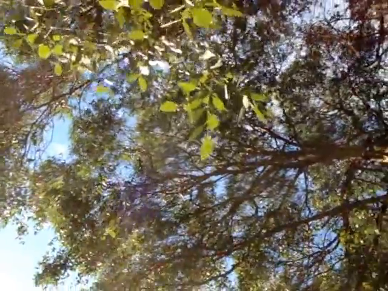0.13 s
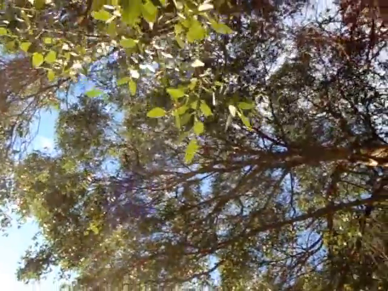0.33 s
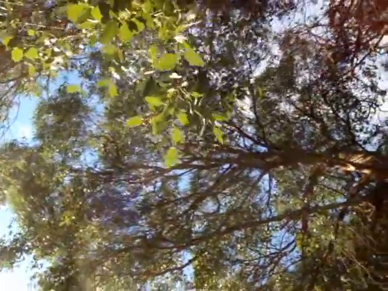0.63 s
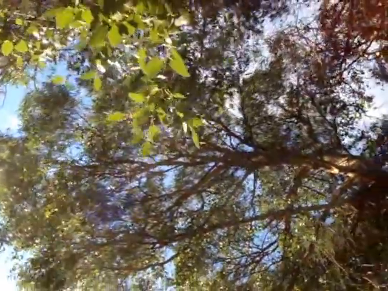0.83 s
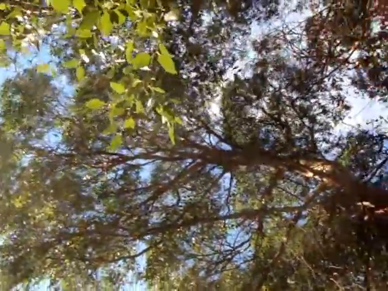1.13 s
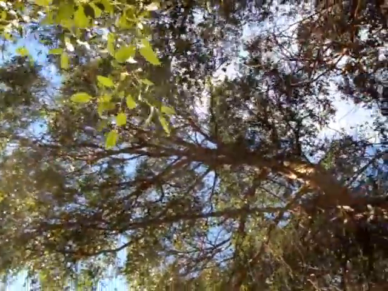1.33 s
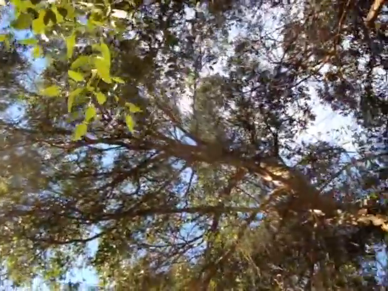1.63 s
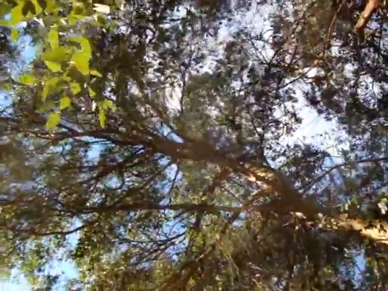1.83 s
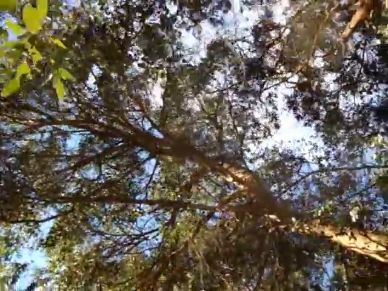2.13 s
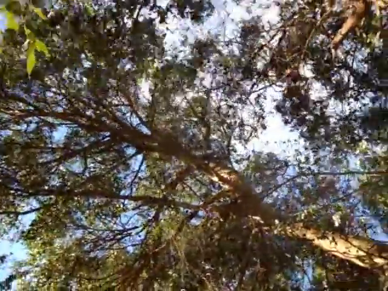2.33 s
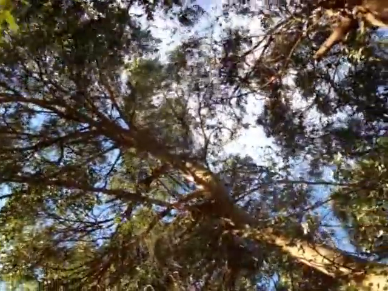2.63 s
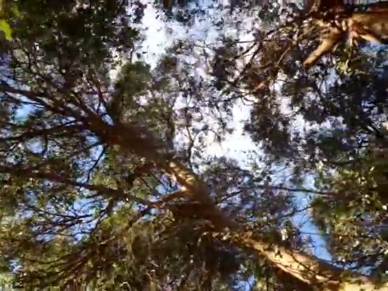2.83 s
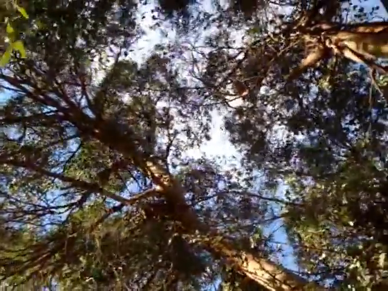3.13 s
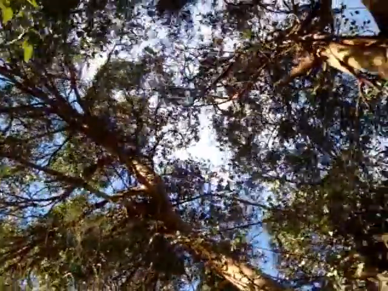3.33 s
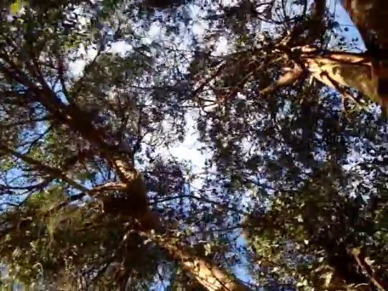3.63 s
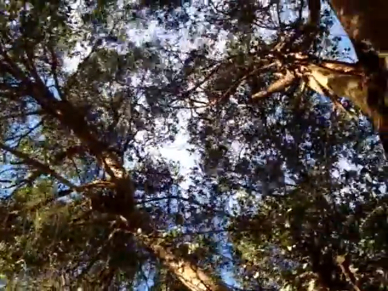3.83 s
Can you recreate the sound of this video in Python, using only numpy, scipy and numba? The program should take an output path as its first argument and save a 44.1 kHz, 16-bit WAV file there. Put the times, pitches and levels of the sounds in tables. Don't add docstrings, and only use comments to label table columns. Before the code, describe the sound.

Wind swells through tall tree leaves, with low thumps buffeting the microphone and faint bird chirps.

```python
import sys
import numpy as np
from scipy import signal
from scipy.fft import rfft, irfft
from scipy.io import wavfile
from numba import njit

SR = 44100
rng = np.random.default_rng(int(sys.argv[2]) if len(sys.argv) > 2 else 0)


def voltage_ratio(decibels):
    exponent = np.asarray(decibels, float) / 20
    return 10 ** exponent


def wav_record(signal):
    frames = np.transpose(np.atleast_2d(signal))
    bounded = np.clip(frames, -1, 1)
    quanta = np.round(bounded * 32767).astype(np.int16)
    wavfile.write(sys.argv[1], SR, quanta)


N = 176400

# time in seconds, close leaf hiss in dB, far canopy roar in dB.
WIND = [
    (0.0, -48.5, -51.5),
    (0.51, -47, -49),
    (0.68, -46, -49),
    (1.25, -44, -45.5),
    (1.73, -42, -43),
    (2.46, -38, -43),
    (2.87, -38, -43),
    (4.0, -41, -44.5),
]


def unit(x):
    return x / np.sqrt(np.mean(x ** 2))


def curve(table, axis=1):
    rows = np.array(table, float)
    return np.interp(np.arange(N) / SR, rows[:, 0], rows[:, axis])


def walk(rate):
    levels = rng.standard_normal(600)
    at = np.arange(N) * (rate / SR)
    k = at.astype(int)
    u = at - k
    slew = u * u * (3 - 2 * u)
    return 1.15 * (levels[k] + (levels[k + 1] - levels[k]) * slew)


def band(x, hz, octaves):
    edges = np.clip(hz * 2 ** (octaves / 2 * np.array([-1, 1])), 10, SR / 2.2)
    return signal.sosfilt(signal.butter(2, edges, "band", fs=SR, output="sos"), x)


def burst(s, length, lo_hz, hi_hz):
    hz, t = np.arange(N // 2 + 1) * SR / N, np.arange(N) / SR
    inside = (hz > lo_hz) & (hz < hi_hz)
    noise = irfft(rfft(rng.standard_normal(N)) * inside, N)
    return unit(noise) * np.exp(-((t - s) / length) ** 2)


@njit
def wavelets(n, at, size, step, cycles, phase):
    out = np.zeros(n)
    for k in range(len(at)):
        width = cycles[k] / step[k] / 2
        for i in range(max(0, int(at[k] - 3 * width)), min(n, int(at[k] + 3 * width))):
            d = i - at[k]
            out[i] += size[k] * np.exp(-(d / width) ** 2) * np.sin(2 * np.pi * (step[k] * d + phase[k]))
    return out


def bird():
    # start in seconds, length in seconds, level in dB, first pitch in Hz, last pitch in Hz.
    whistles = [(0.455, 0.053, -51, 3530, 3480), (0.488, 0.028, -43.5, 3400, 3480),
                (0.507, 0.046, -49, 3530, 3440), (0.53, 0.039, -53, 3680, 3630),
                (0.553, 0.04, -46.5, 3580, 3570), (0.589, 0.036, -42, 3544, 3565),
                (0.617, 0.032, -40, 3565, 3610), (0.651, 0.024, -42, 3640, 3550),
                (0.656, 0.033, -45.5, 3460, 3460), (.69, .02, -52, 3560, 3570),
                (0.698, .025, -52, 3450, 3500), (0.857, 0.018, -52, 3980, 3940),
                (0.878, .015, -50, 3900, 3890), (.89, .028, -51, 3950, 3880),
                (0.912, 0.029, -51, 3400, 3440), (0.942, .025, -56, 3750, 3850),
                (2.493, 0.02, -42.5, 3910, 3890), (2.512, 0.025, -44, 3730, 3960),
                (2.535, 0.018, -43, 4040, 4150), (2.558, 0.016, -48, 4000, 4000),
                (2.645, .025, -48, 4050, 3950), (2.859, 0.035, -46, 4720, 4670),
                (2.878, .02, -50, 4480, 4500), (3.041, 0.018, -42, 3920, 3920),
                (3.055, .018, -46, 4060, 4090), (3.056, .016, -45, 3780, 3670),
                (3.072, .02, -48, 3900, 3920), (3.083, 0.028, -42, 4160, 4140),
                (3.123, .016, -50, 4100, 4060)]
    t, out = np.arange(N) / SR, 0
    warble = 1 + .004 * walk(140)
    trill = np.cumsum(85 * (1 + 0.19 * walk(30))) / SR
    tremor = voltage_ratio(1.2 * walk(90)) * (1 + 0.3 * np.sin(2 * np.pi * trill))
    for s, length, db, hz0, hz1 in whistles:
        u = np.clip((t - s) / length, 0, 1)
        tone = np.sin(2 * np.pi * np.cumsum((hz0 + (hz1 - hz0) * u) * warble) / SR)
        breath = np.sin(np.pi * u) ** .5
        out = out + voltage_ratio(db) * breath * tone * tremor * np.sqrt(2)
    echo_s, echo_db = .018, -10
    lag = np.arange(SR // 4) / SR
    trunks = rng.standard_normal(len(lag)) * np.exp(-lag / echo_s) * (lag > .004)
    trunks = trunks / np.sqrt(np.sum(trunks ** 2))
    return out + voltage_ratio(echo_db) * signal.fftconvolve(out, trunks)[:N]


def twigs():
    # time in seconds, peak in dB, pitch in Hz, length in cycles.
    ticks = [(.0675, -32, 5900, 17), (.304, -35, 2700, 1.4), (.3065, -40, 2850, 8), (.8325, -34, 1850, 4),
             (.8342, -35, 3700, 7), (.8352, -30.5, 2700, 6), (.993, -36, 3100, 7), (.9925, -37, 3900, 1.6),
             (2.4775, -24, 2600, 1.0), (2.4785, -29, 1250, 2), (2.4795, -28, 2150, 5),
             (2.4825, -28, 1800, 1.6), (2.6945, -25, 3500, 2)]
    s, db, hz, cycles = np.array(ticks, float).T
    return wavelets(N, s * SR, voltage_ratio(db), hz / SR, cycles, rng.random(64)[:len(s)])


def shivers():
    # middle in seconds, length in seconds, low edge in Hz, high edge in Hz, level in dB.
    flutters = [
        (3.67, .09, 7300, 8400, -49),
        (2.27, .05, 1500, 9000, -46),
        (3.275, .016, 6650, 7300, -42),
        (3.283, .005, 6000, 9700, -39),
        (.885, .04, 3700, 4150, -52),
        (2.53, .03, 3700, 4200, -47),
        (3.075, .035, 3700, 4250, -47),
        (.835, .003, 1300, 4600, -44),
    ]
    return sum(voltage_ratio(db) * burst(s, length, lo, hi) for s, length, lo, hi, db in flutters)


def thumps():
    # time in seconds, peak in dB, pitch in Hz, length in cycles.
    strikes = [(1.2294, -25.5, 240, 1.7), (1.276, -21, 313, 1.3), (1.2869, -25, 190, 1.5),
               (1.2934, -14.5, 207, 0.92), (1.3297, -20.3, 175, 0.48), (1.3386, -25.5, 244, 1.5),
               (1.386, -22.5, 190, 1.5), (1.424, -20.5, 265, 1.3), (1.4371, -18.5, 341, 0.73),
               (1.4487, -28, 136, 1.5), (1.4607, -18, 190, 0.45), (1.4655, -21, 225, 0.8),
               (1.473, -18, 207, 0.91), (1.4917, -25, 207, 1.3), (1.499, -18.5, 244, 0.96),
               (1.5118, -26, 161, 1.8), (1.522, -14.5, 225, 0.63), (1.5308, -21.5, 313, 1.5),
               (1.5382, -20.5, 313, 1.26), (1.5619, -21.5, 437, 1.7), (1.6016, -26, 244, 1.1),
               (1.6067, -19, 288, 0.9), (1.6124, -25.4, 175, 1.1), (1.6213, -24, 288, 1.5),
               (1.6447, -22.8, 190, 1.5), (1.6612, -20, 190, 1.4), (1.6753, -16.5, 265, 1.5),
               (1.6798, -27, 207, 0.73), (1.6926, -22, 207, 2), (1.705, -20.7, 190, 0.9),
               (1.7157, -18.5, 223, 1.7), (1.731, -10.5, 225, 0.37), (1.7379, -23, 265, 1.3),
               (1.7419, -18, 190, 1.5), (1.7497, -25.1, 91, 1.7), (1.7606, -23, 265, 0.93),
               (1.7687, -21.5, 288, 1.1), (1.7757, -17.5, 313, 0.89), (1.7878, -17, 206, 0.87),
               (1.8134, -6, 266, 0.46), (1.8243, -23.5, 148, 1.4), (1.832, -15, 225, 1.2),
               (1.8429, -18, 225, 1.3), (1.856, -19.5, 244, 1.8), (1.8867, -22, 313, 1.8),
               (1.899, -18, 267, 1), (1.9067, -19, 288, 0.88), (1.9211, -18, 247, 1.7),
               (1.9311, -16.5, 244, 0.51), (2.0063, -26, 138, 1.1),
               (2.6843, -27, 161, 0.94), (2.7826, -20.5, 161, 0.48), (2.8742, -20.5, 173, 0.73),
            (2.8856, -23, 125, 0.57), (3.1208, -23.5, 207, 0.68), (3.3137, -25.5, 105, 0.95),
            (3.6801, -27.5, 175, 1.1), (3.6958, -24.8, 207, 1.04), (3.8167, -14.5, 203, 0.67),
            (3.854, -23, 190, 0.74), (3.866, -9.5, 341, 0.77), (3.8903, -26.5, 175, 1),
            (3.9259, -19, 174, 0.77),
               (1.077, -24, 205, .6),
        (1.11, -33, 200, .8),
        (1.18, -27, 200, 1.6),
        (1.972, -32, 150, 0.9),
        (1.991, -28, 210, 1),
        (2.108, -29, 220, 0.64),
        (2.13, -22.5, 230, .6),
        (2.166, -29, 170, 1.1),
        (3.04, -29, 130, 0.84),
        (3.973, -30, 130, .8),
    ]
    s, db, hz, cycles = np.array(strikes, float).T
    side = rng.integers(0, 2, 128)[:len(s)] / 2 - .06
    return wavelets(N, s * SR, 0.67 * voltage_ratio(db), hz / SR, 1.18 * cycles, side)


def eddies():
    # time in seconds, level in dB.
    stream = [(0, -88), (.95, -75), (1.04, -46.5), (1.4, -36.5), (1.75, -33), (1.93, -33.5), (2.03, -49),
              (2.08, -60), (2.14, -39), (2.2, -62), (2.38, -52.5), (2.46, -64), (2.7, -51), (2.95, -54),
              (3.05, -42.5), (3.2, -63), (3.31, -47), (3.36, -84)]
    # middle in seconds, length in seconds, level in dB.
    puffs = [
        (3.688, 0.016, -41),
        (3.88, 0.057, -41.5),
        (3.973, 0.051, -48),
        (2.878, 0.019, -44),
    ]
    per_s, spread_db = 300, 2.1
    mid_hz, hz_per_db, octaves = 249, 6, 0.48
    t = np.arange(N) / SR
    puff = sum(voltage_ratio(db) * np.exp(-((t - s) / length) ** 2) for s, length, db in puffs)
    strength = (voltage_ratio(curve(stream)) + puff) * voltage_ratio(walk(24.9))
    draw, octs = rng.random((3, 2000)), rng.standard_normal(2000)
    at = np.cumsum(-np.log(1 - draw[0])) / per_s * SR
    keep = at < N - 1
    at, draw, octs = at[keep], draw[:, keep], octs[keep]
    here = strength[at.astype(int)]
    centre_hz = np.clip(mid_hz + hz_per_db * (20 * np.log10(here) + 35), 50, 500)
    hz = centre_hz * 2 ** (octaves * octs)
    size = here * voltage_ratio(-spread_db * np.log(1 - draw[1]))
    cycles = 0.94 * (0.59 + 0.95 * draw[0])
    return wavelets(N, at, size, hz / SR, cycles, draw[2])


def foliage(colour, taps_db):
    taps_per_s, spread_db = 740, -0.5
    swell_db, patch_db, flicker_db = 0.07, 0.08, 0.56
    pts = np.array(colour, float)
    chance = rng.random((2, N))
    taps = unit((chance[0] < taps_per_s / SR) * voltage_ratio(-spread_db * np.log(1 - chance[1])))
    out, swell, patch = 0, walk(3), walk(6)
    for hz in 31.25 * 2 ** np.arange(0, 8.5, 1 / 3):
        patch = .8 * patch + .6 * walk(6)
        air = unit(band(rng.standard_normal(N) + voltage_ratio(taps_db) * taps, hz, 1 / 3))
        db = np.interp(np.log(hz), np.log(pts[:, 0]), pts[:, 1], pts[0, 1] - 15)
        db = db + 10 * np.log10(hz)
        out = out + voltage_ratio(db + swell_db * swell + patch_db * patch + flicker_db * walk(18)) * air
    return unit(out)


def canopy_roar():
    # frequency in Hz, level in dB per Hz.
    roar_colour = [(40, -44), (120, -14.5), (250, -5), (500, -0.5), (800, -0.5), (1200, -4), (1800, -12),
                   (3000, -28.5)]
    return voltage_ratio(curve(WIND, axis=2) + 2.5) * foliage(roar_colour, -17.5)


def leaf_hiss():
    # frequency in Hz, level in dB per Hz.
    hiss_colour = [(700, -19), (1300, -7), (2200, -0.5), (4000, -2), (6000, -2), (7500, -1), (9000, -8.5),
                   (10300, -5.5)]
    return voltage_ratio(curve(WIND, axis=1) + 1.5) * foliage(hiss_colour, -12)


def scene():
    trees = leaf_hiss() + canopy_roar() + shivers() + twigs()
    mono = trees + eddies() + thumps() + bird()
    return np.array([mono, mono])


def starve(x):
    hole_share, from_hz, width_hz, hole_db = .022, 4900, 560, -35
    top_hz = 10100
    hz, _, z = signal.stft(x, SR, nperseg=384)
    which = (hz / width_hz).astype(int)
    holes = (rng.random((which.max() + 1, z.shape[-1])) < hole_share)[which]
    holes &= (hz > from_hz)[:, None]
    holes |= np.roll(holes, 1, axis=1)
    x = signal.istft(z * np.where(holes, voltage_ratio(hole_db), 1), SR, nperseg=384)[1][..., :N]
    over = np.clip(np.arange(N // 2 + 1) * SR / N - top_hz + 80, 0, None)
    return irfft(rfft(x) * voltage_ratio(-over * .2), N)


def unlike_specks():
    # middle in seconds, low edge in Hz, high edge in Hz.
    specks = [
        (.878, 6800, 8400),
        (.878, 4100, 5300),
        (.902, 4500, 5800),
        (2.11, 5130, 7000),
        (2.62, 6200, 8400),
        (2.62, 4100, 5300),
        (3.177, 6800, 8400),
        (3.177, 4500, 6400),
        (3.572, 4150, 5800),
        (3.688, 6230, 7700),
    ]
    side = voltage_ratio(curve(WIND, axis=1) - 9) * sum(burst(s, .013, lo, hi) for s, lo, hi in specks)
    return side * np.array([[1], [-1]])


def top_cut(x):
    return signal.sosfilt(signal.butter(12, 10620, fs=SR, output="sos"), x)


def record(dry):
    thinned = signal.sosfilt(signal.butter(2, 68, "high", fs=SR, output="sos"), dry)
    mix = starve(thinned) + unlike_specks()
    return top_cut(mix)


dry = scene()
out = record(dry)
wav_record(out)
```